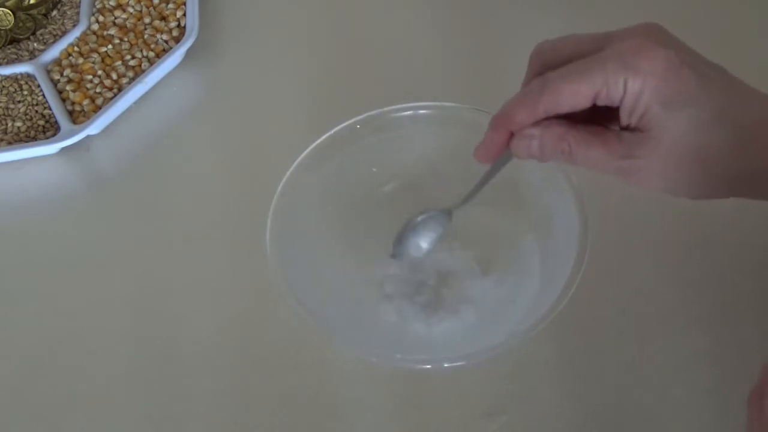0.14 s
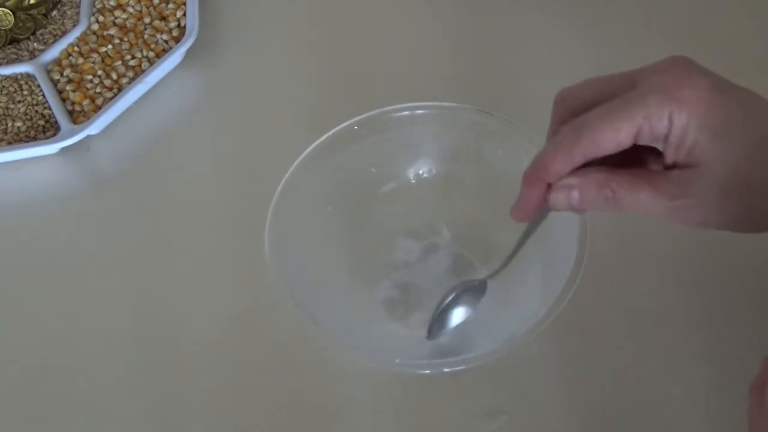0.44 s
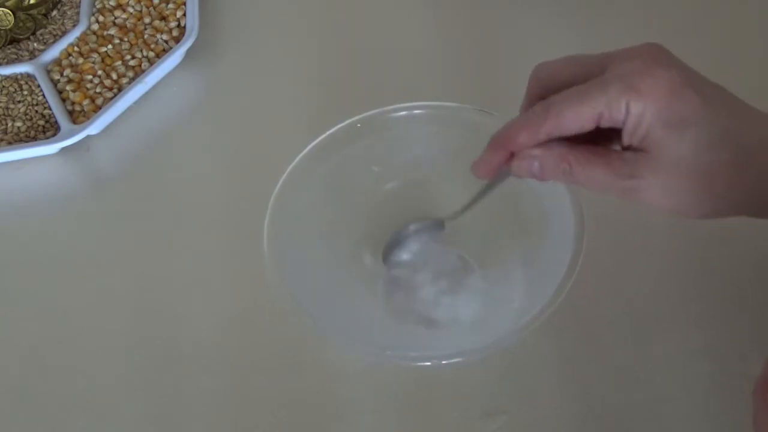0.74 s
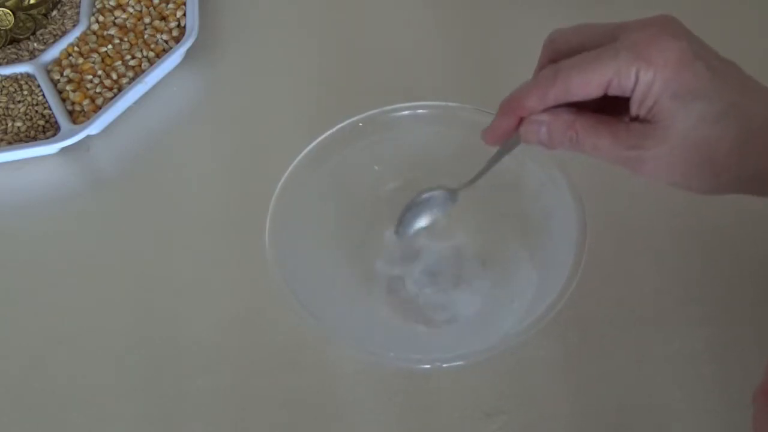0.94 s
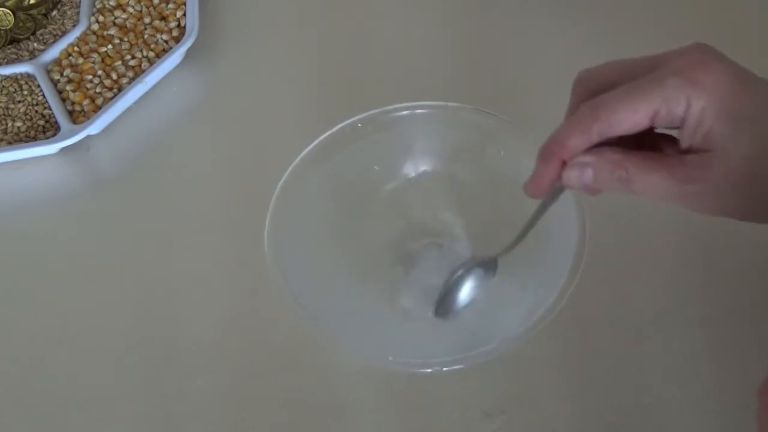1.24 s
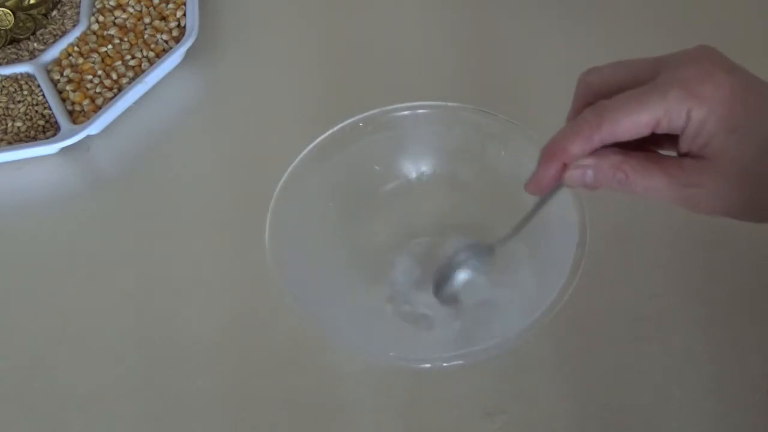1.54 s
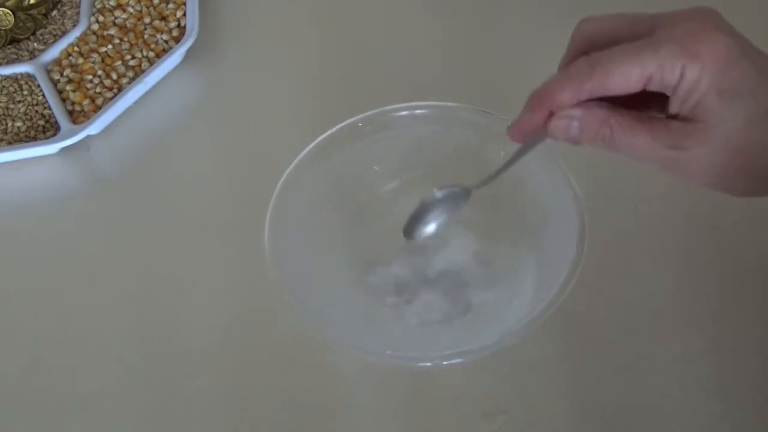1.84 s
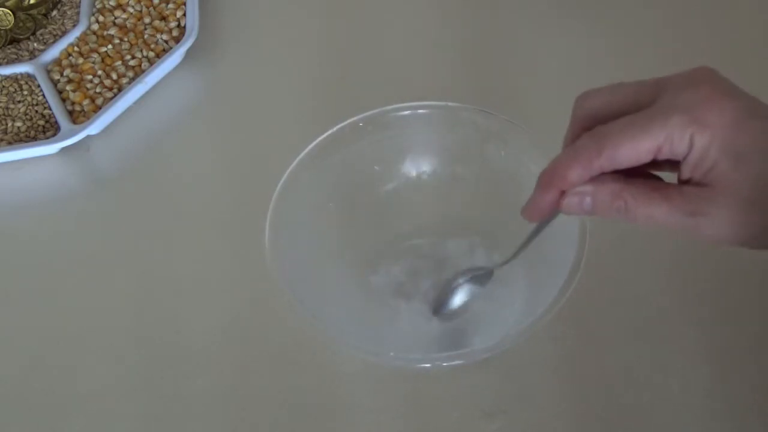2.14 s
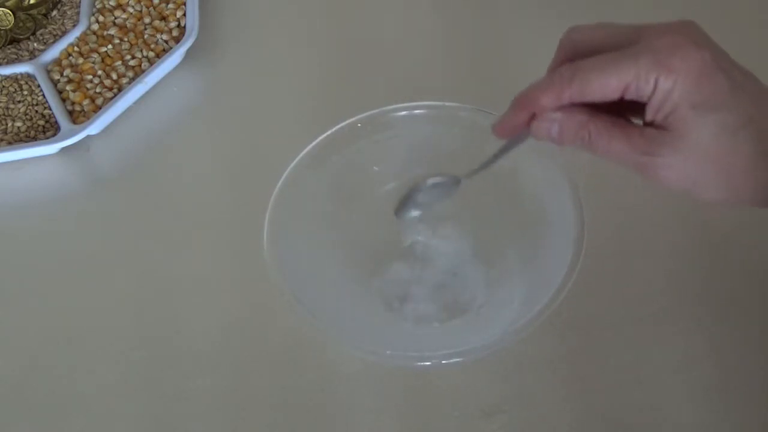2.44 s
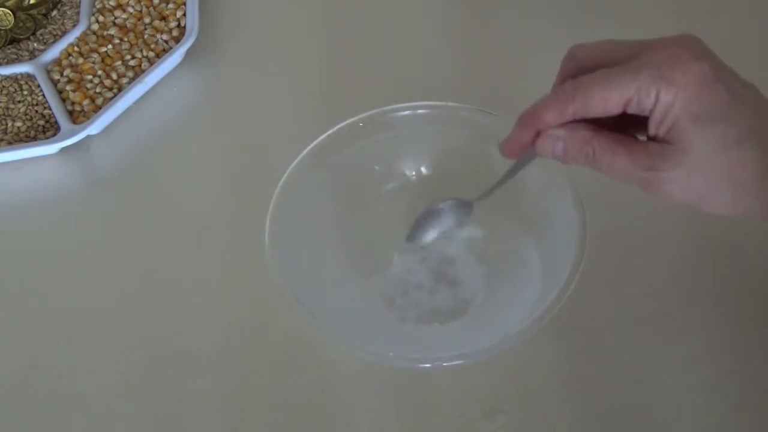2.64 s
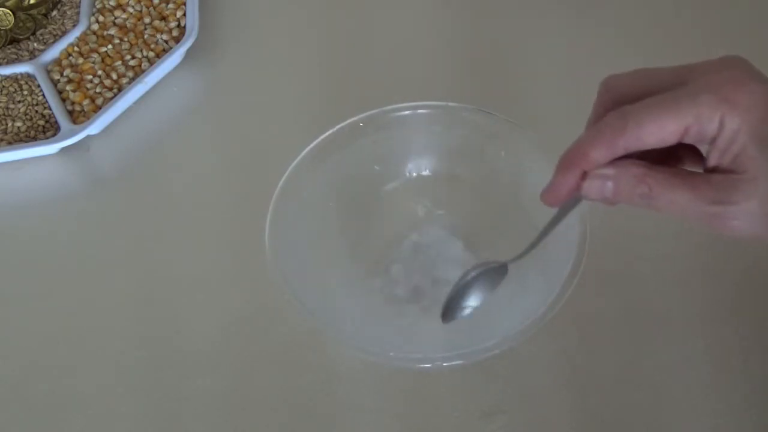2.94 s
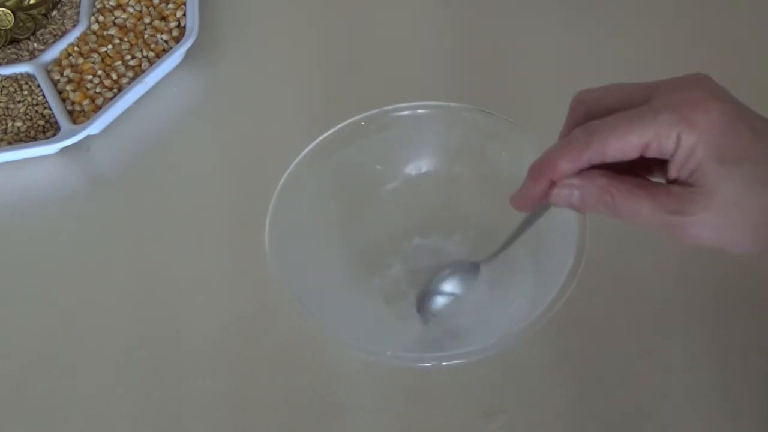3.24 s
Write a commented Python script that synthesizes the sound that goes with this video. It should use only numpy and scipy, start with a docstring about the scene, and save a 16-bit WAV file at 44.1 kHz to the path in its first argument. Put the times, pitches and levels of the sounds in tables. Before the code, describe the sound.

Gritty spoon stirring in a glass bowl, brisk scrapes with sharp clinks, close in a quiet kitchen.

```python
"""Spoon stirring gritty paste in a glass bowl

A steel teaspoon stirs paste around a glass bowl on a kitchen table, about two turns a second.
Knocks, ticks, short scratches and rubs are impulsive forces that excite the damped modes of bowl and spoon;
grains under the spoon are a dense random train of such forces. Stick-slip makes brief squeaks; low shaped
noise gives the rumble of the pushed bowl and thumps under firm knocks. A short room tail and faint room
tone surround it."""
import sys
import numpy as np
from scipy import signal
from scipy.fft import rfft, irfft
from scipy.io import wavfile

SR = 44100
rng = np.random.default_rng(int(sys.argv[2]) if len(sys.argv) > 2 else 0)


def waveform_to_disk(signal):
    """Save audio, clipped to [-1, 1], as 16-bit WAV at the path in sys.argv[1]."""
    frames = np.transpose(np.atleast_2d(signal))
    scaled = np.clip(frames, -1, 1) * 32767
    samples = np.round(scaled).astype(np.int16)
    wavfile.write(sys.argv[1], SR, samples)


N = 149940  # samples, 3.4 s

# Spectrum of the dense vibration between the modes: f/Hz, relative level/dB
CLACK_SPECTRUM = [(250, -5.5), (550, -21), (930, 2.5), (1350, -5.5), (2000, 7.5), (2700, -0.5), (3700, 11),
                  (4600, 0), (6000, -4.5), (8800, -2.5), (10700, -2), (12000, -12.5), (16000, -13)]
SPLIT_HZ = (2500, 5500)  # borders between glass ring, clink and treble
CLUMP_HZ = 82.5  # rate limit of the unevenness in grains, squeaks and judder


def blows():
    """Impulsive excitation: knocks and chattering rubs on the wall; ticks, scratches and rubs of the edge."""
    # Knocks and short chattering rubs on the wall, levels before trim:
    # t/s, glass ring level/dB, clink level/dB, treble level/dB, chatter length/s
    knocks = [(0.1023, -27.5, -31, -41, 0.0079), (0.149, -29.5, -26, -36.5, 0.031),
              (0.183, -41.5, -28.5, -37, 0.018), (0.242, -35, -40, -63, 0.009),
              (0.318, -35, -52, -46, 0.0053), (0.419, -34.5, -35, -37, 0.011),
              (0.607, -30.5, -24.5, -45, 0.008), (0.7443, -34, -28, -39.5, 0.0042),
              (0.76, -32.5, -27, -42, 0.0057), (0.771, -59, -22.5, -35, 0.022),
              (0.804, -32, -24, -34.5, 0.0057), (0.984, -27.5, -23.5, -37, 0.0093),
              (1.015, -31.5, -20, -32.5, 0.0028), (1.032, -30, -20, -29, 0.02),
              (1.098, -30.5, -25.5, -39, 0.0019), (1.4085, -21.5, -17, -31, 0.0079),
              (1.526, -32, -31.5, -42, 0.016), (1.56, -23.5, -22.5, -33.5, 0.014),
              (2.2067, -30.5, -27, -42, 0.0016), (2.316, -36, -29, -38, 0.0018),
              (2.322, -32, -28.5, -36.5, 0.008), (2.6156, -27.5, -25, -34, 0.004),
              (2.6785, -33.5, -27.5, -33.5, 0.0035), (2.698, -39.5, -25, -32.5, 0.03),
              (3.163, -30, -29.5, -42, 0.0033), (3.2772, -30, -31.5, -47, 0.01)]
    # Ticks, short scratches and rubs of the spoon's edge, levels before trim:
    # t/s, clink level/dB, treble level/dB, chatter length/s
    ticks = [(.582, -39, -39.5, 0.008), (0.953, -49, -36, 0.0032), (.972, -41, -40, 0.0029),
             (1.154, -26, -32, 0.0082), (1.18, -28, -29, 0.003), (1.193, -32.5, -27, 0.038),
             (1.27, -53, -35, 0.0019), (1.322, -37.5, -38, 0.0056), (1.87, -35, -32, 0.0068),
             (1.929, -40.5, -35, 0.03), (2.136, -49, -44, 0.00085), (2.1772, -25.5, -25.5, 0.002),
             (2.3041, -35, -30.5, 0.0041), (2.4079, -29.5, -35, 0.0014), (2.432, -52, -36.5, 0.001),
             (2.514, -34.5, -40, 0.0036), (2.7465, -23, -29.5, 0.011), (2.842, -31, -33, 0.0023),
             (2.9, -61, -39, 0.0022), (2.973, -34.5, -31, 0.018), (3.061, -30, -31, 0.0027),
             (3.1211, -34.5, -35.5, 0.0011), (3.233, -56, -38, 0.0015), (3.317, -42, -36.5, 0.0023)]
    knock_trim_db, tick_trim_db = [0.5, -3.5, 2.5], [-3.5, -5.5, -1.5]  # ring, clink, treble
    tick_ring_db = -10.5  # ring relative to clink, before trim
    out = np.zeros(N)
    for start, *levels, length in knocks:
        levels_db = np.add(levels, knock_trim_db)
        add(out, start, contact(levels_db, chatter=2.9, chatter_s=length))
    for start, clink, treble, length in ticks:
        levels_db = np.add([clink + tick_ring_db, clink, treble], tick_trim_db)
        add(out, start, contact(levels_db, chatter=10.5, chatter_s=length))
    return out


def contact(levels_db, chatter, chatter_s, crack_db=-3):
    """Forced response: one impulse and a fast random chatter of impulses ring the bowl."""
    window_s, crack_s = 0.025, 0.0006  # reference time of the rms levels, decay of the crack
    kept_band_hz = (494, 11700)  # band kept for the ring and clack; low thumps are in judder
    t = np.arange(SR // 20) / SR
    hits = rng.choice([-1, 1], len(t)) * (rng.random(len(t)) < 0.1)
    rattle = hits * np.exp(-(t / chatter_s) ** 2)
    rattle = rattle / (np.linalg.norm(rattle) + 1e-9)
    force = chatter * np.sqrt(chatter_s / window_s) * rattle
    force[0] += 1  # the opening impulse
    body = signal.fftconvolve(force, bowl(detune=0.0078, spread_db=4.5))
    crack = noise(CLACK_SPECTRUM, len(t)) * np.exp(-t / crack_s)
    add(body, 0, amp(crack_db) * crack / np.linalg.norm(crack))
    body = signal.lfilter(*signal.butter(2, kept_band_hz, "band", fs=SR), body)
    # Each band gets the energy of its rms level held for window_s.
    energy_root = np.sqrt(window_s * SR)
    return sum(amp(db) * energy_root * part / np.linalg.norm(part)
               for db, part in zip(levels_db, bands(body)))


def bowl(detune, spread_db):
    """Modal superposition: damped sines plus dense vibration; the pressing spoon alters modes by spot."""
    # Modes of bowl and spoon: nominal f/Hz, relative level/dB, 60 dB decay time/s
    modes = [(870, -1.5, 0.046), (1038, -7.5, 0.074), (1641, 3, 0.13), (1843, -14, 0.27), (2352, -7, 0.15),
             (2795, -22.5, 0.28), (3230, -9, 0.039), (3740, -0.5, 0.044), (4470, -0.5, 0.047),
             (9340, -0.5, 0.038)]
    # Damping of the dense vibration: f/Hz, 60 dB decay time/s
    clack_decay = [(300, 0.22), (1500, 0.07), (4000, 0.063), (9000, 0.029), (15000, 0.013)]
    clack_db = 3  # dense vibration relative to the modal ring
    t = np.arange(SR // 4) / SR
    ring = 0
    for hz, db, t60 in modes:
        weight, shift = rng.standard_normal(2)
        envelope = amp(db + spread_db * weight - 60 * t / t60)
        sine = np.sin(2 * np.pi * hz * (1 + detune * shift) * t)
        ring = ring + envelope * rng.choice([-1, 1]) * sine
    clack = fade(noise(CLACK_SPECTRUM, len(t)), clack_decay)[:len(t)]
    return ring / np.linalg.norm(ring) + amp(clack_db) * clack


def scrape(count=14):
    """Random impulsive forcing: grains ring the bowl from a wandering spot; crystals break, steel glints."""
    # One sub-table per turn of the spoon, scraping levels before trim:
    # t/s, glass ring level/dB, clink level/dB, treble level/dB
    spoon_turns = [
        [(0.0, -40, -34.5, -38), (0.098, -55, -42, -44.5)],
        [(0.105, -52, -34.5, -41), (0.251, -39, -22.5, -36.5), (0.57, -54.5, -48, -40.5)],
        [(0.59, -40.5, -31, -35.5), (0.842, -39.5, -25, -38.5), (0.95, -54, -40, -42)],
        [(0.97, -48, -39, -42.5), (1.204, -43.5, -36, -36), (1.39, -61, -34.5, -40)],
        [(1.42, -48, -50, -42), (1.56, -37, -26, -31.5), (1.78, -45.5, -36.5, -38), (2.17, -77, -46.5, -54.5)],
        [(2.185, -34.5, -26, -37), (2.337, -50.5, -34.5, -41.5), (2.6, -64, -58, -49)],
        [(2.62, -36, -22, -43.5), (2.764, -42, -30.5, -37), (3.15, -61, -48, -45.5)],
        [(3.17, -47, -29.5, -41.5), (3.4, -45, -35, -38.5)],
    ]
    trim_db = [1, -10, 0.5]  # ring, clink, treble
    grains_per_s, grain_spread_db = 2400, 3
    full_press_db = -27.5  # untrimmed ring level at which the spoon drives the lowest modes fully
    light_low_hz = 1350  # light rubbing hardly reaches the modes below this
    spot_hz = 6  # the contact advances by two spots per cycle of this rate
    t = np.arange(N) / SR
    times, *columns = np.vstack(spoon_turns).T
    levels = [np.interp(t, times, db) for db in columns]

    firm = grains(grains_per_s, grain_spread_db)
    high_pass = signal.butter(2, light_low_hz, "high", fs=SR)
    light = signal.lfilter(*high_pass, grains(grains_per_s, grain_spread_db))
    press = np.minimum(amp(levels[0] - full_press_db), 1)
    force = np.sqrt(press) * firm + np.sqrt(1 - press) * light

    wander = drift(spot_hz, N) / 2 + drift(CLUMP_HZ, N) / 2
    spot = np.floor(2 * spot_hz * t + wander) % count
    grit = 0
    for k in range(count):
        response = bowl(detune=0.0282, spread_db=5.5)
        grit = grit + signal.oaconvolve(force * (spot == k), response)[:N]
    ring, clink, treble = map(unit, bands(grit))

    # Coarse and fine crystals, then tiny slips of the spoon's edge; gains relative to the unit band.
    coarse = amp(-8) * snaps(per_s=300, span_hz=(2283, 5480), cycles=2.1)
    fine = amp(-5) * snaps(per_s=1600, span_hz=(4350, 11640), cycles=1.9)
    glints = amp(-9.5) * snaps(per_s=60, span_hz=(8690, 9750), cycles=8.9)
    parts = ring, unit(clink + coarse), unit(treble + fine + glints)
    return sum(part * amp(db + trim) for part, db, trim in zip(parts, levels, trim_db))


def grains(per_s, spread_db):
    """Random point process: clicks of uneven size and random sign, swelling in clumps."""
    clump_db = 5  # limit of the swelling either way
    spread = spread_db * np.minimum(rng.exponential(1, N), 4)
    size = amp(spread + clump_db * np.tanh(drift(CLUMP_HZ, N)))
    return size * rng.choice([-1, 1], N) * (rng.random(N) < per_s / SR)


def snaps(per_s, span_hz, cycles, count=20):
    """Resonant impulse response: each snap has its own short ring somewhere in a range of pitch."""
    clicks = grains(per_s, spread_db=4.5)
    kind = rng.integers(0, count, N)
    t = np.arange(SR // 50) / SR
    out = 0
    for k, hz in enumerate(np.linspace(*span_hz, count)):
        ring = np.sin(2 * np.pi * hz * t) * hz * t * np.exp(-hz * t / cycles)
        out = out + signal.oaconvolve(clicks * (kind == k), ring)[:N]
    return unit(out)


def squeaks():
    """Stick-slip oscillation: steel or glass sings briefly on one rough, wavering pitch."""
    # Slips: t/s, mean f/Hz, Gaussian decay width/s, level/dB before onset and roughness
    slips = [(.18, 833, 0.0043, -18.5), (.403, 8800, 0.0077, -24.5), (.6285, 9510, 0.0032, -19.5),
             (.638, 854, 0.018, -32), (.7, 870, 0.008, -28), (0.828, 2820, 0.011, -22),
             (1.229, 1630, 0.021, -36), (1.322, 6900, 0.011, -33), (1.527, 878, 0.054, -32.5),
             (1.561, 859, 0.0078, -16.5), (1.692, 6660, 0.012, -27), (2.209, 1635, 0.025, -24.5),
             (2.223, 9360, 0.0053, -20.5), (2.323, 1067, 0.0079, -21.5), (2.413, 8770, .005, -25),
             (2.747, 9340, 0.0039, -14)]
    waver_hz, rough_db, rise_cycles = 60, 2, 2  # rms pitch deviation, rms roughness, onset constant
    out = np.zeros(N)
    t = np.arange(SR // 8) / SR
    for start, hz, decay, db in slips:
        cycles = np.cumsum(hz + waver_hz * drift(440, len(t))) / SR
        onset = 1 - np.exp(-cycles / rise_cycles)
        grip = amp(rough_db * drift(CLUMP_HZ, len(t))) * onset
        envelope = np.exp(-(t / decay) ** 2 / 2)
        add(out, start, amp(db) * grip * envelope * np.sin(2 * np.pi * cycles))
    return out


def judder():
    """Enveloped shaped noise: low rumbles of the pushed bowl and low thumps under firm knocks."""
    # Low rumbles and thumps: start t/s, time from start to onset of decay/s, level/dB
    rumbles = [(0.0, 0.074, -52), (0.107, 0.019, -40), (0.167, 0.1, -47.5), (0.377, 0.075, -40.5),
               (0.601, 0.011, -34.5), (0.69, 0.021, -35), (0.753, 0.026, -32), (0.793, .12, -46),
               (0.973, 0.018, -37), (1.039, 0.071, -45), (1.298, 0.056, -46.5), (1.404, 0.012, -38),
               (1.524, 0.15, -43), (1.691, 0.074, -39), (1.905, 0.041, -47.5), (2.18, 0.22, -53),
               (2.604, 0.01, -37.5), (2.666, 0.12, -47.5), (3.164, 0.0056, -39), (3.276, 0.017, -45)]
    # Spectrum of the low noise: f/Hz, relative level/dB
    low_spectrum = [(30, -27), (75, -11), (120, -5), (200, -4), (280, 8.5), (350, 0.5), (460, -6),
                    (800, -15.5), (2000, -33)]
    rise_s, fall_s, lump_db = 0.005, 0.024, 2.5  # linear rise, decay constant, rms unevenness
    t = np.arange(N) / SR
    envelope = np.zeros(N)
    for start, length, db in rumbles:
        rise = np.clip((t - start) / rise_s, 0, 1)
        fall = np.exp(-np.maximum(t - start - length, 0) / fall_s)
        envelope += amp(db) * rise * fall
    low_noise = noise(low_spectrum, N) * amp(lump_db * drift(CLUMP_HZ, N))
    return envelope * unit(low_noise)


def kitchen(x):
    """Room reverberation: a short diffuse tail and weak sideways reflections, in mid-side stereo."""
    # Reverberation: f/Hz, 60 dB decay time/s
    room_decay = [(150, 0.36), (1000, 0.26), (4000, 0.23), (12000, 0.15)]
    # Spectrum of the sideways reflections: f/Hz, relative level/dB
    side_spectrum = [(250, -5), (600, 9.5), (3000, 4.5), (8000, -3), (14000, -10)]
    tail_db, side_db, side_decay_s = -13.5, -18.5, 0.041  # gains on unit-energy responses
    balance_db = -0.36  # applied to the left, and with opposite sign to the right
    t = np.arange(SR // 2) / SR
    build_up = np.minimum(t / 0.068, 1)
    tail = fade(rng.standard_normal(len(t)) * build_up, room_decay)[:len(t)]
    sideways = noise(side_spectrum, len(t)) * np.exp(-t / side_decay_s)
    sideways = sideways / np.linalg.norm(sideways)
    mid = x + amp(tail_db) * signal.fftconvolve(x, tail)[:N]
    side = amp(side_db) * signal.fftconvolve(x, sideways)[:N]
    return np.array([mid * amp(balance_db) + side, mid * amp(-balance_db) - side])


def room_tone():
    """Stationary background: faint noise of fixed spectrum."""
    # Spectrum of the room tone: f/Hz, relative level/dB
    tone_spectrum = [(25, 0), (141, 13), (3820, 3), (10700, -46), (16000, -13)]
    return amp(-55) * noise(tone_spectrum, N)


def amp(db):
    """Logarithmic level: decibels to amplitude gain."""
    return 10 ** (np.asarray(db) / 20)


def unit(x):
    """Mean-square normalisation: scales to rms 1."""
    return x / np.sqrt(np.mean(x ** 2) + 1e-20)


def read(points, hz):
    """Logarithmic frequency scale: interpolates a table of values over log f."""
    f, value = np.transpose(points)
    return np.interp(np.log(hz + 1), np.log(f), value)


def add(mix, start_s, sound):
    """Linear superposition: adds a sound into the mix, in place, from a start time."""
    part = mix[max(round(start_s * SR), 0):][:len(sound)]
    part += sound[:len(part)]


def noise(colour, size):
    """Spectral shaping: white noise weighted to a given spectrum, rms 1."""
    hz = np.fft.rfftfreq(size, 1 / SR)
    spectrum = rfft(rng.standard_normal(size)) * amp(read(colour, hz))
    return unit(irfft(spectrum, size))


def drift(hz, size):
    """Low-pass random motion: noise under a Gaussian spectral roll-off, rms 1."""
    roll_off = np.exp(-(np.fft.rfftfreq(size, 1 / SR) / hz) ** 2)
    return unit(irfft(rfft(rng.standard_normal(size)) * roll_off, size))


def fade(x, t60s):
    """Frequency-dependent damping: each band decays at its own rate; total energy 1."""
    hz, t, z = signal.stft(x, SR, nperseg=128)
    decay = amp(-60 * t / read(t60s, hz)[:, None])
    y = signal.istft(z * decay, SR, nperseg=128)[1]
    return y / np.linalg.norm(y)


def bands(x):
    """Band filtering: splits into glass ring, clink and treble."""
    cuts = [(SPLIT_HZ[0], "low"), (SPLIT_HZ, "band"), (SPLIT_HZ[1], "high")]
    filters = [signal.butter(5, hz, kind, fs=SR, output="sos") for hz, kind in cuts]
    return [signal.sosfilt(sos, x) for sos in filters]


def scene():
    """Superposition of sources: the bowl just right of centre, over faint room tone."""
    sources = blows() + scrape() + squeaks() + judder()
    return kitchen(sources + room_tone())


def record(dry):
    """Band limitation: the recorder's linear-phase low-pass."""
    low_pass = signal.firwin(511, 15900, window=("kaiser", 9), fs=SR)  # cutoff in Hz
    return signal.oaconvolve(dry, low_pass[None], "same")


dry = scene()
out = record(dry)
waveform_to_disk(out)
```